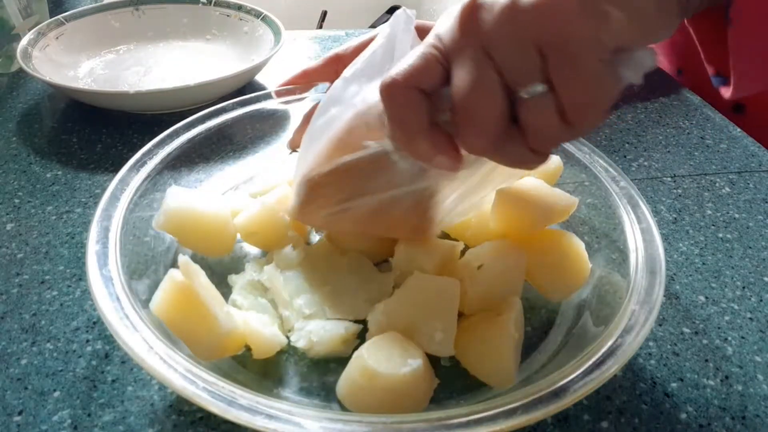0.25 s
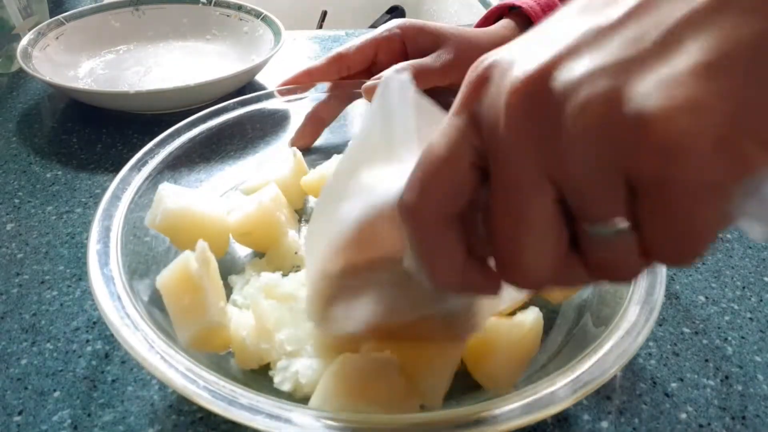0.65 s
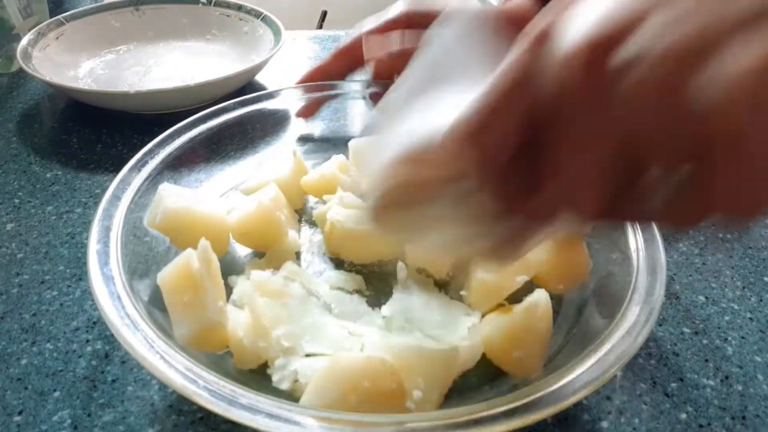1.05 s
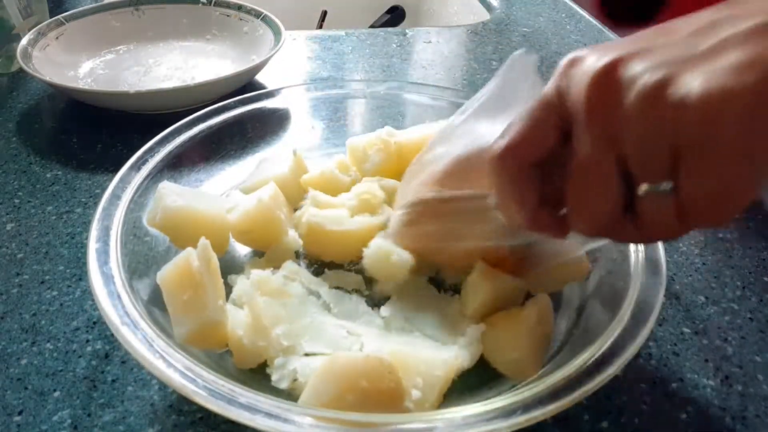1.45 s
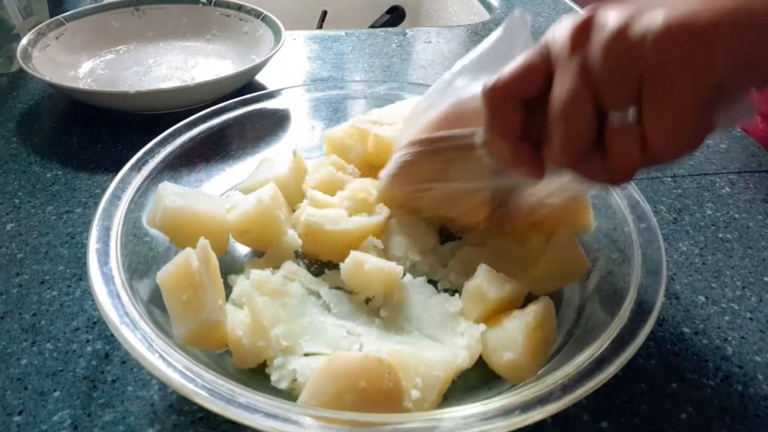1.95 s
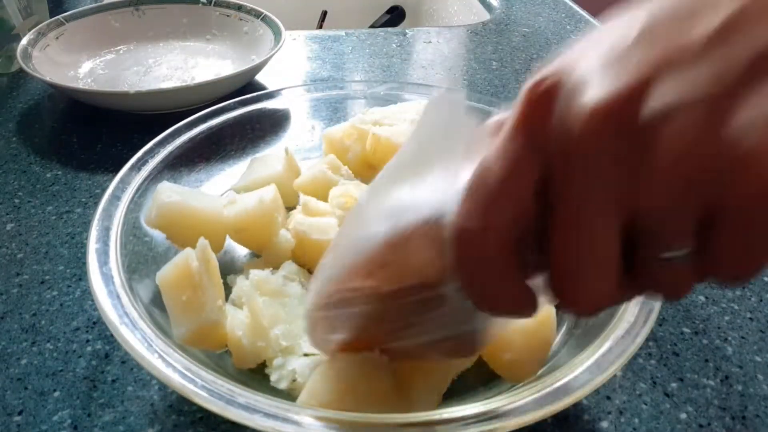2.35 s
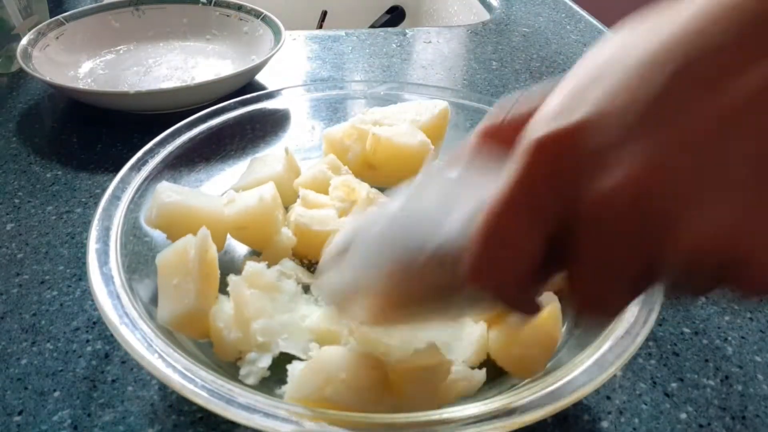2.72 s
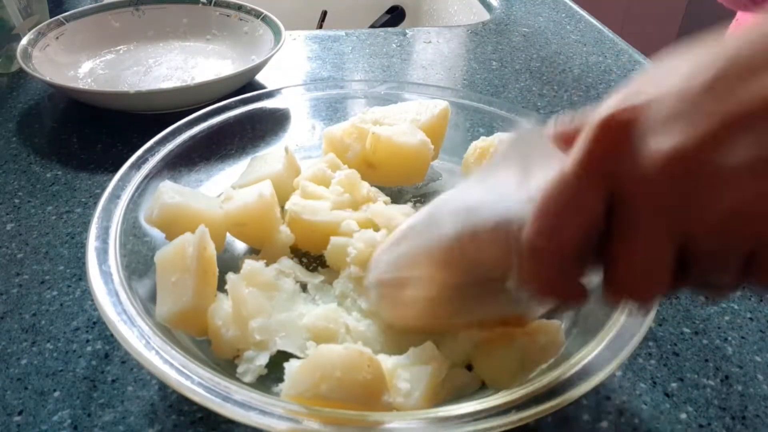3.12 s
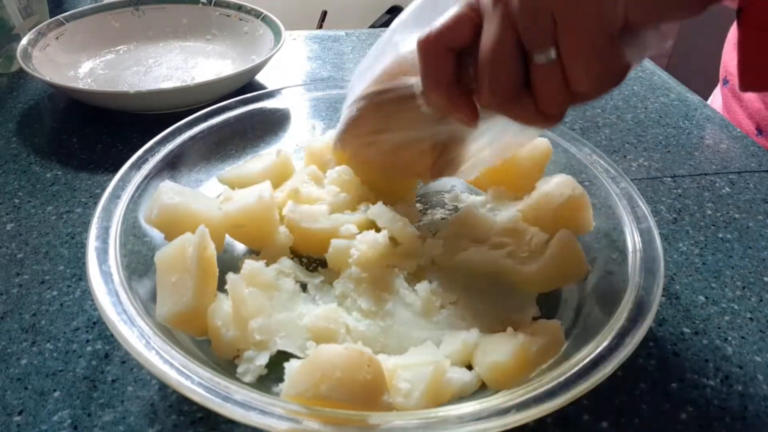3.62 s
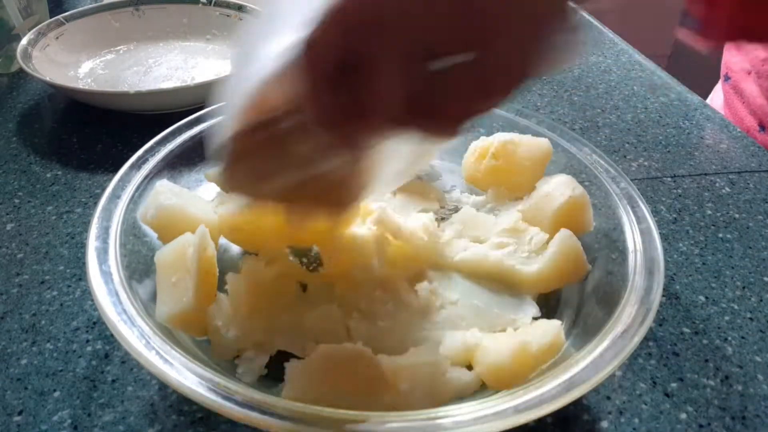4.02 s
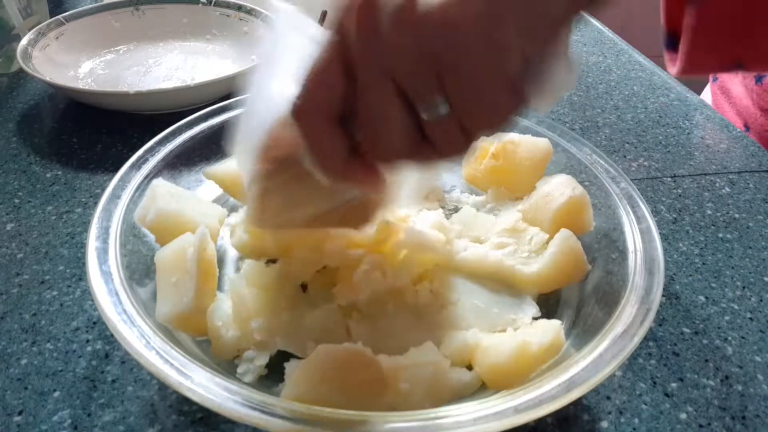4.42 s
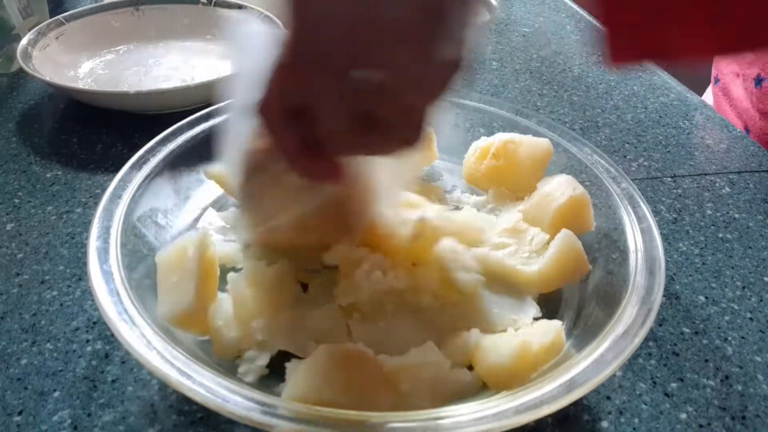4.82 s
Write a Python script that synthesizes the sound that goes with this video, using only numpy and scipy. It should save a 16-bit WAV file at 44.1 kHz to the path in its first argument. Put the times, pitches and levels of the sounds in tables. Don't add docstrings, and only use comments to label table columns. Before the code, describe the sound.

Irregular dull glass knocks from mashing boiled potatoes, two much louder bumps, restless plastic rustling, and a low soft hum behind.

```python
import sys
import numpy as np
from scipy import signal
from scipy.fft import rfft, irfft
from scipy.io import wavfile

SR = 44100
rng = np.random.default_rng(int(sys.argv[2]) if len(sys.argv) > 2 else 0)


def ratio_of_db(decibels):
    return 10 ** (np.asarray(decibels, float) / 20)


def waveform_to_disk(signal):
    frames = np.transpose(np.atleast_2d(signal))
    scaled = np.clip(frames, -1, 1) * 32767
    samples = np.round(scaled).astype(np.int16)
    wavfile.write(sys.argv[1], SR, samples)


N = 223221


def rms_one(x):
    return x / np.sqrt(np.mean(x ** 2) + 1e-20)


def at_hz(points, hz):
    table_hz, values = np.transpose(points)
    return np.interp(np.log(np.maximum(hz, 1)), np.log(table_hz), values)


def panned(pan_db):
    return ratio_of_db(np.array([pan_db / 2, -pan_db / 2]))


def colour(x, spectrum):
    hz = np.arange(N // 2 + 1) * SR / N
    return irfft(rfft(x) * ratio_of_db(at_hz(spectrum, hz)), N)


def band(x, low_hz, high_hz):
    sos = signal.butter(2, [low_hz, high_hz], "band", fs=SR, output="sos")
    return rms_one(signal.sosfilt(sos, x))


def drift(rate_hz):
    knots = rng.standard_normal(2000)
    return np.interp(np.arange(N) * rate_hz / SR, np.arange(len(knots)), knots)


# (frequency [Hz], left-right likeness [-1 to 1])
COHERENCE = [(60, 1), (130, 0.91), (290, 0.87), (640, 0.68), (1410, -0.97), (3100, -0.27), (6820, -0.03),
             (15000, -0.16)]
# (frequency [Hz], level per Hz [dB])
AIR_SPECTRUM = [(20, -54), (35, -22.5), (55, -8), (75, -1.5), (105, 2.5), (150, -15.5), (225, -23),
                (325, -13), (430, -13), (520, -16.5), (1000, -25.5), (1400, -30.5), (3600, -41),
                (15700, -60)]
# (time [s], level [dB])
BASS_LEVEL = [(0.0, -45.5), (0.27, -43), (0.35, -39.5), (0.52, -46), (1.63, -49.5), (1.99, -41.5),
              (2.0, -44.5), (2.77, -42), (3.16, -45), (3.18, -40.5), (3.27, -44.5), (4.33, -46.5),
              (4.55, -44.5), (5.06, -44)]


def room_tone():
    mid, side = rng.standard_normal((2, N))
    hz, alike = np.transpose(COHERENCE)
    alike = np.clip(alike, .001, .999)
    mid = colour(mid, np.c_[hz, 10 * np.log10(1 + alike)])
    side = colour(side, np.c_[hz, 10 * np.log10(1 - alike)])
    tone = colour(mid + side * [[1], [-1]], AIR_SPECTRUM) * panned(1.8)[:, None]
    s, load_db = np.transpose(BASS_LEVEL)
    bass_db = np.interp(np.arange(N) / SR, s, load_db)
    bass = band(tone, 14, 294) * ratio_of_db(bass_db + 5)
    hum_db = -46 + 0.35 * (bass_db - bass_db.mean()) + 1.54 * drift(14)
    hum = band(tone, 133, 453) * ratio_of_db(hum_db)
    air = band(tone, 280, 20000) * ratio_of_db(-47.5)
    return bass + hum + air


# (frequency [Hz], decay time t60 [s])
KITCHEN_T60 = [(200, 0.21), (530, 0.2), (1390, 0.24), (3680, 0.24)]
# (frequency [Hz], level [dB])
WALL_REFLECTION = [(200, 3.5), (1100, 4), (1400, -6), (1800, 7.5), (2800, -2.5), (4000, -12), (6000, -16)]


def kitchen_echo(x):
    t, tail = np.arange(SR // 2) / SR, 0
    mid, side = rng.standard_normal((2, len(t)))
    for hz in 180 * 2. ** np.arange(6):
        alike = np.clip(at_hz(COHERENCE, hz), 0, 1)
        pair = np.sqrt(1 + alike) * mid + np.sqrt(1 - alike) * side * [[1], [-1]]
        octave = band(pair, hz / np.sqrt(2), hz * np.sqrt(2)) * np.sqrt(hz)
        tail = tail + octave * ratio_of_db(-60 * t / at_hz(KITCHEN_T60, hz))
    tail = tail * (t > .004) / np.sqrt(np.sum(tail ** 2))
    echo = signal.fftconvolve(x.mean(axis=0)[None], tail, axes=1)[:, :N]
    return colour(echo, WALL_REFLECTION)


# (time [s], level [dB], decay time t60 [s])
BUCKLES = [
    (0.824, -48, 0.34),
    (1.02, -35.5, 0.11),
    (2.12, -60, 0.34),
    (2.699, -37.5, .08),
    (3.745, -62, 0.041),
    (4.906, -53, 0.045),
]


def crumples():
    t, level = np.arange(N) / SR, 0
    for s, level_db, t60 in BUCKLES:
        level = level + (t > s) * ratio_of_db(level_db - 60 * np.abs(t - s) / t60)
    roughness = ratio_of_db(2.7 * drift(400))
    return level * roughness * band(rng.standard_normal((2, N)), 2300, 3800) * panned(5.3)[:, None]


# (grip time [s], let-go time [s], crackle at let-go [dB], swell in the squeeze [dB])
HAND_SQUEEZES = [(0, 0.015, -55.5, -3), (0.085, 0.31, -45, 2.5), (0.315, 0.347, -37, 7.5),
                 (.39, 0.513, -41.5, 8.5), (0.606, 0.718, -56, 9), (0.782, 0.87, -41.5, 9.5),
                 (0.943, 1.005, -38.5, 26), (1.197, 1.25, -59, -9), (1.255, 1.464, -47, 7.5),
                 (1.534, 1.623, -42.5, 11.5), (1.723, 1.79, -55.5, -1), (1.788, 1.884, -46.5, 10),
                 (1.905, 2.065, -43, 2), (2.115, 2.191, -40.5, -0.5), (2.257, 2.36, -56.5, 2),
                 (2.41, 2.674, -44.5, 3), (2.699, 2.756, -44.5, -6), (2.8, 2.93, -52.5, 8.5),
                 (2.957, 3.108, -44, 0.5), (3.15, 3.172, -39, 2.5), (3.246, 3.33, -59.5, 4),
                 (3.347, 3.359, -52, 6), (3.447, 3.7, -54.5, -1.5), (3.692, 3.755, -46, 6.5),
                 (3.83, 3.92, -45, 8.5), (4.06, 4.307, -50.5, 8.5), (4.325, 4.455, -42.5, 14),
                 (4.52, 4.66, -64.5, -3), (4.679, 4.89, -56.5, -1), (4.92, 5.001, -42, 2.5)]


def grip():
    rise_db_per_s, let_go_db_per_s = 400, 285
    creep_db, creep_db_per_s = -25.5, 110
    t = np.arange(0, N + 64, 64) / SR
    start, end, top_db, swell_db = np.transpose(HAND_SQUEEZES)[:, :, None]
    held = top_db - swell_db * np.clip((end - t) / np.maximum(end - start, .005), 0, 1)
    after = np.maximum(t - end, 0)
    fall = np.minimum(let_go_db_per_s * after, creep_db_per_s * after - creep_db)
    level = held - rise_db_per_s * np.maximum(start - t, 0) - fall
    return np.interp(np.arange(N) / SR, t, level.max(axis=0))


# (time [s], peak level [dB], left-right difference [dB])
PLASTIC_SNAPS = [(0.0715, -38, 6), (0.2857, -41, 3.5), (0.3391, -26, 2.0), (0.769, -44, -1),
                 (0.787, -42, 2), (0.9692, -32, 8), (1.1696, -26.5, 4), (1.555, -29, 7), (1.595, -32, 3.5),
                 (1.7243, -31, 1), (1.9051, -38, 1), (1.92, -23, 4), (2.1181, -40, 6), (2.373, -35, 8),
                 (2.3835, -34, 9), (2.41, -44, 0), (2.4632, -22.5, 1), (2.705, -21, 9), (2.837, -30, 4),
                 (3.1492, -34, 3.0), (3.1695, -33, 3.5), (3.2879, -37, 0), (3.3433, -31, 9),
                 (3.6077, -38, 1.5), (3.687, -27, 5), (3.7442, -26, -1), (3.8412, -30.5, 7),
                 (4.061, -40, 8), (4.2777, -29.5, -2), (4.907, -26, 6)]
# (frequency [Hz], level per Hz [dB])
BAG_SPECTRUM = [(300, 0.5), (700, 5.5), (1500, 1), (2500, 3), (4500, 1.5), (6500, -0.5), (8000, -2.5),
                (11000, 3.5), (15700, -1.5)]


def bag():
    crackle_db = grip()
    sizes = ratio_of_db(2.8 * np.minimum(rng.exponential(1, N), 6))
    chance = rng.random(N)
    creases_per_s = 4000 * ratio_of_db(4 * drift(60))
    creases = sizes * (chance < creases_per_s / SR)
    power = (rms_one(creases) * ratio_of_db(crackle_db) * panned(3)[:, None]) ** 2
    for s, peak_db, pan_db in PLASTIC_SNAPS:
        power[:, round(s * SR)] += (ratio_of_db(peak_db + 5.5) * panned(pan_db)) ** 2
    t = np.arange(SR // 8) / SR
    puff = ratio_of_db(-120 * t / 0.0036) + ratio_of_db(-21.5 - 120 * t / 0.087)
    power = signal.fftconvolve(power, puff[None] / puff.sum(), axes=1)[:, :N]
    noise = np.sqrt(np.abs(power)) * rng.standard_normal((2, N))
    heard = colour(noise, BAG_SPECTRUM) * ratio_of_db(3)
    sos = signal.butter(1, [1500, 4500], "band", fs=SR, output="sos")
    low = signal.sosfilt(sos, heard)
    return heard + low * (ratio_of_db(-0.9) - 1)


def struck(blows, modes, scale_t60, tilt_db, spread_db, level_db):
    out, t = np.zeros((2, N + SR)), np.arange(SR // 2) / SR
    hz, mode_db, t60 = np.transpose(modes)[:, :, None]
    phase = rng.normal(0, 0.96, (len(modes), 1))
    ear_sign = rng.choice([-1, 1], (len(modes), 1)) * [[[1]], [[-1]]]
    phase = phase + np.clip(hz / 2300, 0, .8) * ear_sign
    decay = ratio_of_db(-60 * t / (np.minimum(t60, .25) * scale_t60))
    rings = np.sin(2 * np.pi * hz * t + phase) * decay
    rings = rings * (1 - np.exp(-t / 0.00019))
    split_hz = hz * rng.uniform(0.0037, 0.032, (2, len(modes), 1))
    rings = rings * (1 + 0.78 * np.cos(2 * np.pi * split_hz * t))
    chance = rng.normal(0, 1, (len(blows), len(modes)))
    for (s, peak_db, bright_db, pan_db), luck in zip(blows, chance):
        hardness = np.clip(np.log2(hz[:, 0] / 900), 0, 1) * (bright_db + tilt_db)
        strength = ratio_of_db(peak_db + level_db + mode_db[:, 0] + hardness + spread_db * luck)
        at = round(s * SR)
        out[:, at:at + len(t)] += panned(pan_db)[:, None] * np.einsum("m,cmt->ct", strength, rings)
    return out[:, :N]


def cracks(blows, level_db):
    out, t = np.zeros((2, N)), np.arange(200) / SR
    for s, peak_db, bright_db, pan_db in blows:
        width_s = .00011 * ratio_of_db(-.3 * (bright_db + 8))
        u = t / width_s - 3
        pulse = u * np.exp(.5 - u ** 2 / 2)
        at = round(s * SR)
        out[:, at:at + len(t)] += panned(pan_db)[:, None] * ratio_of_db(peak_db + level_db) * pulse
    return out


# (time [s], peak [dB], brightness [dB], left-right difference [dB])
POTATO_SQUASH = [
    (.321, -34.5, 0, 0),
]
# (frequency [Hz], level [dB], decay time t60 [s])
COUNTER_MODES = [(222, 3, 0.066), (317, -6.5, 0.11), (420, -16, 0.076)]


def squash():
    return struck(POTATO_SQUASH, COUNTER_MODES, 0.86, 0, 1.1, 0.95), cracks(POTATO_SQUASH, -9.5)


# (time [s], peak [dB], brightness [dB], left-right difference [dB])
COUNTER_BUMP = [
    (.3685, -2, -16, 1.5),
]
# (frequency [Hz], level [dB], decay time t60 [s])
COUNTER_BUMP_MODES = [(240, -15, 0.14), (340, -5.5, 0.097), (459, -8, 0.11), (556, -3.5, 0.061),
                      (623, -14, 0.3), (730, 0, 0.04), (826, 0.5, 0.04), (968, -4, 0.11),
                      (1209, -13.5, 0.28), (1280, -5, 0.04), (1420, -3.5, 0.099), (1638, -3, 0.13),
                      (1740, 4, 0.05), (2070, -28, 0.031), (2090, 0.5, 0.034), (2450, 4, 0.025),
                      (2680, -11, .06), (2540, 1.5, 0.065), (2620, -10, 0.06), (3300, -41, 0.039),
                      (3440, -14, 0.19), (3700, -17, 0.084), (3780, -19, 0.067), (4460, -45, 0.081)]


def first_bump():
    return struck(COUNTER_BUMP, COUNTER_BUMP_MODES, 1, 12.2, 0.79, -13.5), cracks(COUNTER_BUMP, -8.5)


# (time [s], peak [dB], brightness [dB], left-right difference [dB])
RIM_BUMP = [
    (3.171, -4, -3, 2.5),
]
# (frequency [Hz], level [dB], decay time t60 [s])
RIM_BUMP_MODES = [(238, -13.5, 0.21), (336, -1.5, 0.062), (484, -17, 0.15), (544, -5, 0.082),
                  (619, -8, 0.13), (784, -8.5, 0.081), (822, -6.5, 0.065), (984, 2.5, 0.062),
                  (1190, -11, 0.18), (1430, -7, 0.023), (1510, -10, 0.062), (1690, -13, 0.11),
                  (1740, -8, 0.041), (1953, -3.5, 0.067), (2310, -8, 0.052), (2400, -11, 0.088),
                  (2600, -20, .08), (2764, -11.5, 0.21), (2960, -7.5, 0.034), (3360, -18, .07),
                  (3660, -13, 0.032), (3830, -22, 0.28), (3840, -17, 0.14), (4120, -15, 0.098)]


def second_bump():
    return struck(RIM_BUMP, RIM_BUMP_MODES, 0.84, 4.3, 0.63, -11), cracks(RIM_BUMP, -8.5)


# (time [s], peak [dB], brightness [dB], left-right difference [dB])
PESTLE_KNOCKS = [
    (0.719, -30.5, -17.5, 4.5),
    (0.963, -27.5, -13.5, 2),
    (1.595, -19.5, -9.5, 3),
    (1.92, -16, -8, 3.5),
    (2.402, -29, -22, 4),
    (2.71, -18.5, -8.5, 1.5),
    (2.897, -18, -8, 2),
]
# (frequency [Hz], level [dB], decay time t60 [s])
BOWL_MODES = [(233, -16.5, 0.24), (345, -6.5, 0.17), (465.8, 2.5, 0.099), (557, -12.5, 0.086),
              (619.5, -11, 0.16), (826, -0.5, 0.043), (850, -8, 0.06), (997, 4.5, 0.1), (1183, -13, 0.16),
              (1424, -7, 0.028), (1510, -18, 0.026), (1698, -6.5, 0.072), (1940, -7.5, 0.053),
              (2280, -11, 0.065), (2810, -12, 0.028), (2950, -14, 0.031), (3440, -25, .04),
              (3680, -19, 0.095), (4020, -25, 0.15), (4400, -38, .04)]


def knocks():
    return struck(PESTLE_KNOCKS, BOWL_MODES, 0.87, 12, 2.07, -8), cracks(PESTLE_KNOCKS, -4.5)


def blows():
    ring, crack = np.sum([knocks(), squash(), first_bump(), second_bump()], axis=0)
    heard = ring + crack + kitchen_echo(ratio_of_db(-1.5) * ring + ratio_of_db(13) * crack)
    sos = signal.butter(4, 200, "high", fs=SR, output="sos")
    return signal.sosfilt(sos, heard)


def scene():
    return blows() + bag() + room_tone() + crumples()


def top_cut(x):
    return signal.sosfilt(signal.butter(12, 15720, fs=SR, output="sos"), x)


# (frequency [Hz], level [dB])
PORT_RESONANCE = [(7900, 1), (8400, 2), (9000, 11.5), (9500, 7), (10500, 2.5), (15700, 5.5)]


def record(dry):
    x = 1.054 * np.tanh(colour(dry, PORT_RESONANCE) / 1.31)
    x = colour(x, [(15470, 0), (15520, -24), (15900, -50)])
    return top_cut(x)


dry = scene()
out = record(dry)
waveform_to_disk(out)
```